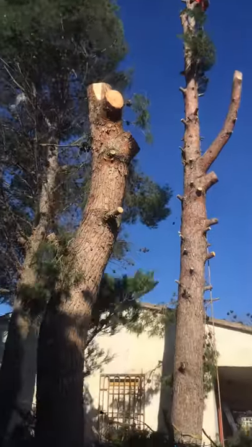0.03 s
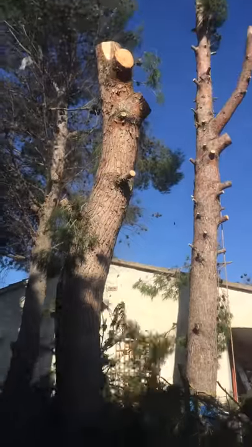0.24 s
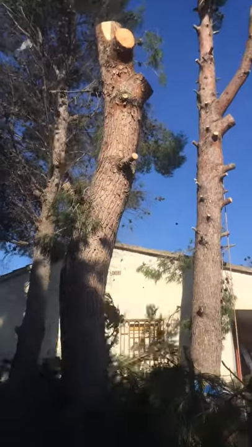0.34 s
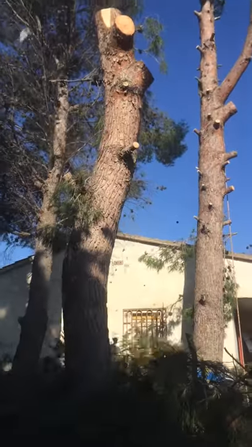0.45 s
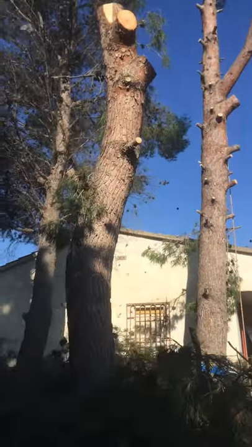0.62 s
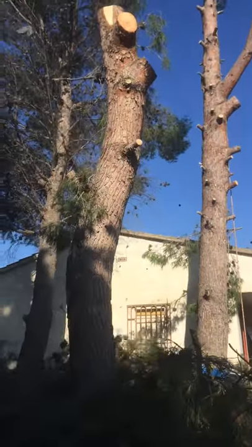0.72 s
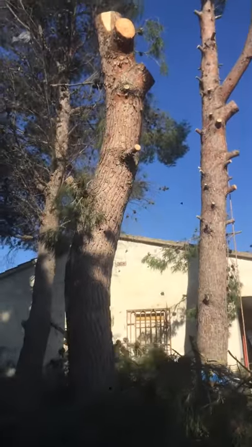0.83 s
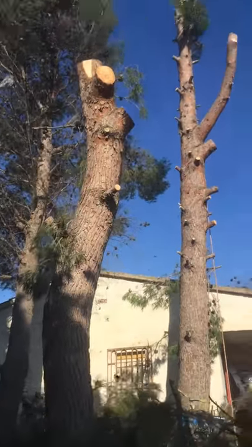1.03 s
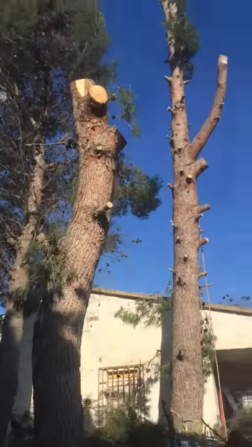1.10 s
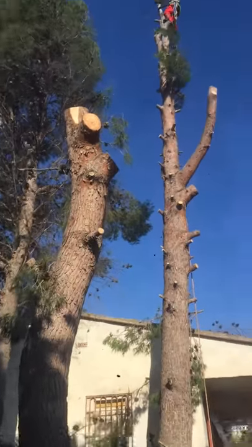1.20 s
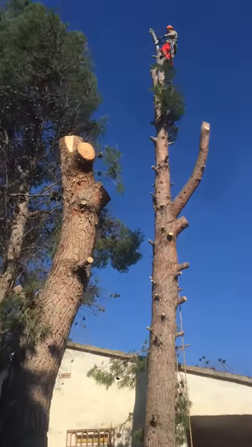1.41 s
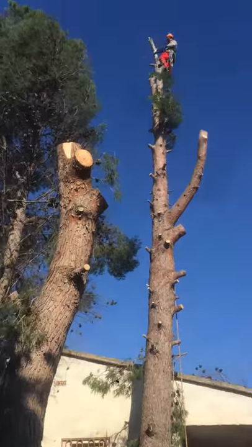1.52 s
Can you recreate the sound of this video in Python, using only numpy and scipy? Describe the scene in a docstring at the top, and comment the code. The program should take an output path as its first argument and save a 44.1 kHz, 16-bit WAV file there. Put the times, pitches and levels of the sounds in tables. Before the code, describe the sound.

A cut pine bough crashes into a heap of branches with rushing needle crackle, a deep ground thump and a sharp stick crack, then fading rustle; a chainsaw idles unevenly above, echoing off a house wall outdoors.

```python
"""A two-stroke chainsaw idles up in a tree throughout, firing only on some turns; ground and house wall echo it.
A few twigs snap, then a cut pine bough crashes into a heap of branches: its needles are a rush of tiny crackles.
The limb thumps the ground and rebounds, made from fading tones; then one stick cracks sharply and rings.
More twigs snap as noise bursts, and the heap's crackling rustle, there from the start, grows uneven and settles.
Low outdoor noise lies behind it all."""
import sys
import numpy as np
from scipy import signal
from scipy.fft import rfft, irfft, next_fast_len
from scipy.io import wavfile
from scipy.ndimage import map_coordinates

SR = 44100
rng = np.random.default_rng(int(sys.argv[2]) if len(sys.argv) > 2 else 0)


def file_out(sig):
    """Save sig as 16-bit WAV at sys.argv[1]."""
    # one column per channel
    cols = np.atleast_2d(sig).T
    # limit, then scale
    lim = np.clip(cols, -1, 1)
    pcm = np.round(lim * 32767).astype(np.int16)
    wavfile.write(sys.argv[1], SR, pcm)


N = 68355  # length [samples]


def amp(db):
    """Turn decibels into a gain."""
    return 10 ** (np.asarray(db) / 20)


def unit(x):
    """Scale a sound to an average (rms) level of 1."""
    return x / np.sqrt(np.mean(x ** 2) + 1e-20)


def colour(points):
    """Gain at any frequency, joining (frequency [Hz], level [dB]) points on a log axis."""
    f, db = np.transpose(points)
    return lambda hz: amp(np.interp(np.log(hz + 1), np.log(f + 1), db))


def filtered(x, response):
    """Shape a sound by a gain that depends on frequency."""
    size = next_fast_len(len(x) + 8192)  # spare room at the end for ringing
    spectrum = rfft(x, size) * response(np.fft.rfftfreq(size, 1 / SR))
    return irfft(spectrum, size)[:len(x)]


def noise(response):
    """Coloured noise of rms 1."""
    return unit(filtered(rng.standard_normal(N), response))


def band(hz, octaves):
    """A bell-shaped gain around hz."""
    return lambda f: 1 / (1 + (np.log2((f + 1) / hz) / octaves) ** 2)


def wobble(rate):
    """A smooth random curve with this many random points a second."""
    points = rng.standard_normal(int(N * rate / SR) + 4)
    return map_coordinates(points, [np.arange(N) * rate / SR])


def since(s):
    """Seconds passed since time s, zero before it."""
    return np.maximum(np.arange(N) / SR - s, 0)


def burst(s, t60, hold=0):
    """A level that jumps up at s, holds, then falls 60 dB in each t60 seconds."""
    return (since(s) > 0) * amp(-60 * since(s + hold) / t60)


def ring(s, hz, t60):
    """A struck object's tone: it starts at s and dies away."""
    return burst(s, t60) * np.sin(2 * np.pi * hz * since(s))


def impulses(rows):
    """A single-sample click for each (time [s], level [dB])."""
    s, db = np.transpose(rows)
    inside = (s >= 0) & (s * SR < N - 1)
    return np.bincount(np.round(s[inside] * SR).astype(int), amp(db[inside]), N)


def crackle(spectrum, rate, spread_db, grain_t60, hiss_db):
    """Countless tiny fractures of uneven size over the hiss of sliding needles, rms 1."""
    sizes = amp(spread_db * np.minimum(rng.exponential(size=N), 4))  # the cap stops freak giants
    hits = sizes * (rng.random(N) < rate / SR)  # rate: fractures per second
    # each fracture is a short fading grain of noise; overlapping grains add their power
    power = np.abs(signal.fftconvolve(hits ** 2, burst(0, grain_t60) ** 2)[:N])
    grains = unit(np.sqrt(power) * rng.standard_normal(N))
    hiss = amp(hiss_db) * rng.standard_normal(N)
    return unit(filtered(grains + hiss, colour(spectrum)))


def foliage():
    """The bough rushes into the heap, swelling until pressed in; the heap rustles by crackling unevenly."""
    # tone of the bough's needles: (frequency [Hz], level [dB per Hz])
    bough_tone = [(150, 5.5), (500, -2), (1000, -4), (2000, 0.5), (3500, -0.5), (6000, 0.5), (10000, -2.5),
                  (13000, -0.5), (15500, -8.5)]
    # tone of the heap's needles: (frequency [Hz], level [dB per Hz])
    needle_tone = [(200, -21), (800, -2.5), (2000, -1), (3500, -0.5), (6000, -1), (10000, -3.5),
                   (13000, -5.5), (15500, -9)]
    # stirring of the heap: (time [s], level [dB])
    rustle = [(0, -34), (.11, -37.5), (.185, -35.5), (.39, -45), (.44, -38.5), (.53, -35.5), (.6, -38),
              (.65, -33.5), (.72, -40), (.77, -42), (.9, -45.5), (.945, -44.5), (.98, -47), (1.05, -48),
              (1.2, -50), (1.35, -56), (1.37, -43.5), (1.42, -46), (1.51, -46.5), (1.55, -54.5)]
    meets_s, pressed_s = 0.1965, 0.28  # the bough meets the heap; it is fully pressed in
    start_db, peak_db, fall_db_per_s = -26.5, -22, 104
    t = np.arange(N) / SR
    rise_db = np.interp(t, [meets_s, pressed_s], [start_db, peak_db])
    crash_level = (t > meets_s) * amp(rise_db - fall_db_per_s * since(pressed_s))
    crash = crash_level * crackle(bough_tone, rate=1200, spread_db=2.0, grain_t60=0.0021, hiss_db=2)
    heap_level = amp(np.interp(t, *np.transpose(rustle)))
    heap = heap_level * crackle(needle_tone, rate=1000, spread_db=6.5, grain_t60=0.0066, hiss_db=3)
    return crash + heap


def limb():
    """The heavy wood knocks and thuds on the ground as fading tones and noise, and the heap shudders."""
    # the limb lands and rebounds: (time [s], level [dB])
    thumps = [(0.2639, 1), (0.3273, -19.5)]
    # tones of the limb on the ground: (frequency [Hz], level [dB], 60 dB fade [s])
    limb_tones = [(65.4, -13, 0.22), (110.3, -12, .11), (186, -3.5, 0.066), (206, -21.5, 0.093),
                  (300, -15.5, 0.093)]
    attack_s = 0.0026  # softens the start of each thud
    knock_db, knock_hz, knock_t60 = -22, 734, 0.052  # hard part of the landing
    shake_db, shake_hz, shake_hold_s, shake_t60 = -31.5, 121, 0.088, 0.05
    landing = thumps[0][0]
    thud = 0
    for s, db in thumps:
        attack = 1 - np.exp(-since(s) / attack_s)
        for hz, level, t60 in limb_tones:
            thud = thud + amp(db + level) * ring(s, hz, t60) * attack
    knock = amp(knock_db) * burst(landing, knock_t60) * noise(band(knock_hz, octaves=0.61))
    shudder = burst(landing, shake_t60, shake_hold_s) * noise(band(shake_hz, octaves=0.44))
    return thud + knock + amp(shake_db) * shudder


def stick():
    """Fibres tear for a moment as noise and set the stick ringing at its own pitches."""
    # tone of tearing fibres: (frequency [Hz], level [dB per Hz])
    fibre_tone = [(500, -18), (3000, -9), (6500, 2.5), (9000, -3.5), (11000, -0.5), (15000, -5)]
    # ringing of the stick: (frequency [Hz], peak level before fading [dB], 60 dB fade [s])
    stick_tones = [(4060, -18, .016), (6130, -11, .011), (7780, -22.5, .012), (14700, -24, .014)]
    crack_s, tear_db, tear_hold_s, tear_t60 = 0.4591, -14.3, 0.002, 0.017
    tear = amp(tear_db) * burst(crack_s, tear_t60, tear_hold_s) * noise(colour(fibre_tone))
    ringing = sum(amp(db) * ring(crack_s, hz, t60) for hz, db, t60 in stick_tones)
    return tear + ringing


def twigs():
    """Twigs break with a click and splinter as noise around their own pitch; a few dry ones ring."""
    # snapping twigs: (time [s], splintering level [dB], centre [Hz], width [octaves], 60 dB fade [s])
    snap_list = [(0.0438, -27.5, 2650, 0.43, .025), (.162, -24, 4400, 0.73, 0.014),
                 (0.196, -32, 10000, 1.2, .012), (.1995, -26, 1780, .6, 0.032),
                 (.2065, -14.5, 6400, 1.34, 0.022), (.246, -17, 5460, 0.82, 0.027),
                 (.2585, -18, 6200, 0.55, 0.019), (0.293, -21, 6500, 4.2, 0.035),
                 (0.3224, -12.5, 7700, 2.5, .011), (0.323, -26, 3940, .35, 0.073),
                 (.3808, -23.5, 10100, 0.71, 0.01), (.4533, -17.5, 10000, 1.1, 0.021),
                 (.6353, -16.5, 4800, .6, 0.0092), (.653, -29, 3720, 0.3, .016),
                 (0.657, -40, 10000, 0.88, 0.012), (0.705, -30, 9500, 0.94, 0.029),
                 (0.9387, -28.5, 10800, 0.96, 0.033), (1.3694, -31.5, 6500, .8, 0.016),
                 (1.4448, -27.5, 6200, 0.49, 0.021), (1.517, -36.5, 7000, 0.62, 0.028)]
    # dry twigs that ring when struck: (time [s], peak level before fading [dB], frequency [Hz], 60 dB fade [s])
    pings = [(0.0416, -28, 2500, .02), (0.6535, -25, 3360, .013), (1.4448, -23.5, 4300, .019),
             (1.516, -32.5, 4160, .022)]
    click_db, click_t60 = -9, 0.0011  # the first break, relative to the splintering
    snaps = 0
    for s, db, hz, octaves, t60 in snap_list:
        click_and_splinter = burst(s, t60) + amp(click_db) * burst(s, click_t60)
        snaps = snaps + amp(db) * click_and_splinter * noise(band(hz, octaves))
    return snaps + sum(amp(db) * ring(s, hz, t60) for s, db, hz, t60 in pings)


def chainsaw():
    """Loud exhaust pops on turns that fire, soft puffs between them, their echoes and a drone."""
    # turns that fire: (time [s], level before the pop gain [dB])
    firings = [(0.0249, -17.5), (0.0915, -24.5), (0.1364, -15), (0.2239, -18), (0.3772, -21),
               (0.4621, -18.5), (0.5498, -15.5), (0.6477, -16), (0.69, -20.5), (0.7306, -19.5),
               (0.7942, -17.5), (0.8591, -15.5), (0.9247, -17.5), (1.0139, -17), (1.0989, -22.5),
               (1.1414, -17), (1.2059, -15.5), (1.2702, -19), (1.3154, -23), (1.3815, -14.5), (1.4685, -15)]
    # tone of an exhaust pop: (frequency [Hz], level [dB])
    pop_tone = [(40, 1), (80, 0.5), (150, 1), (250, 1), (450, 1), (700, -1.5), (1050, -16.5), (1450, -9),
                (1850, -16), (2300, -14.5), (2800, -24), (8000, -41.5), (15000, -46)]
    # echoes of the saw: (delay [s], level [dB], dull above [Hz])
    echo_list = [(.0063, -2.5, 423), (0.0301, -5, 3220)]
    # steady drone: (frequency [Hz], level before wavering [dB rms])
    drone_tones = [(76, -51), (139, -49.5), (185, -47.5), (371, -51), (467, -53)]
    idle_hz, pop_db = 47.36, 2  # crank turns per second; gain of all pops and puffs
    misfire_db, misfire_spread_db = -30.5, 2  # puff of a turn that does not fire, before the pop gain
    gas_db, gas_t60, gas_hz = -18.5, 0.024, 2130  # hiss of each pop
    yard_db, yard_t60 = -9.5, 0.17  # blurred echo tail
    waver_db, drift_rad = 3, 0.7  # how far the drone's level and phase wander

    # spread whole crank turns evenly between firings, and a few before and after
    fired = [s for s, db in firings]
    edges = [fired[0] - 2 / idle_hz] + fired + [fired[-1] + 4 / idle_hz]
    turns = []
    for a, b in zip(edges, edges[1:]):
        turns.extend(np.linspace(a, b, max(round((b - a) * idle_hz), 1), endpoint=False))
    puffs = impulses([(s, misfire_db + misfire_spread_db * np.tanh(rng.standard_normal()))
                      for s in turns if s not in fired])
    strokes = amp(pop_db) * (impulses(firings) + puffs)

    exhaust = colour(pop_tone)
    pop_height = exhaust(np.fft.rfftfreq(N, 1 / SR)).mean()  # brings a unit pop to a peak near 1
    pops = -filtered(strokes, exhaust) / pop_height
    gas_level = signal.fftconvolve(strokes, burst(0, gas_t60))[:N]
    pops += amp(gas_db) * gas_level * noise(band(gas_hz, octaves=1.24))

    echoes = 0
    for s, db, hz in echo_list:
        # the complex factor delays the sound, the division dulls it
        echoes = echoes + amp(db) * filtered(
            pops, lambda f: np.exp(-2j * np.pi * f * s) / (1 + (f / hz) ** 2))
    tail = rng.standard_normal(N) * burst(0.00144, yard_t60)
    yard = amp(yard_db) * signal.fftconvolve(pops, tail / np.linalg.norm(tail))[:N]

    drone = 0
    for hz, db in drone_tones:
        level = amp(db + waver_db * wobble(5.52)) * np.sqrt(2)  # root 2 turns rms into peak
        phase = 2 * np.pi * (hz * since(0) + rng.random()) + drift_rad * wobble(12.46)
        drone = drone + level * np.sin(phase)
    return pops + echoes + yard + drone


def background():
    """Low outdoor noise that ebbs and swells a little."""
    # tone of the outdoor air: (frequency [Hz], level [dB per Hz])
    air_tone = [(25, -34), (50, -3), (75, 4), (100, -4), (135, -7.5), (200, -5.5), (400, -4), (700, -9.5),
                (1050, -13.5), (1600, -17.5), (4000, -25.5), (15000, -57)]
    # ebb and swell around the air level: (time [s], level [dB])
    swell = [(0, -0.5), (.45, -5), (.72, 0.5), (.85, .5), (1.3, 1), (1.55, 3.5)]
    air_db = -42
    level = amp(air_db + np.interp(since(0), *np.transpose(swell)))
    return level * noise(colour(air_tone))


def scene():
    """Everything as heard from the foot of the trees, in one channel."""
    mix = foliage() + limb() + stick() + twigs() + chainsaw() + background()
    return mix[None]


def record(dry):
    """The microphone weakens the deepest bass and cuts off steeply above its upper limit."""
    low_cut_hz, top_hz = 51, 15250

    def passband(hz):
        """Gain of the microphone at each frequency."""
        treble = (1 + (hz / top_hz) ** 240) ** -0.5
        bass = (1 + (low_cut_hz / (hz + 1)) ** 10) ** -0.5
        return treble * bass

    return np.array([filtered(x, passband) for x in dry])


dry = scene()
out = record(dry)
file_out(out)
```